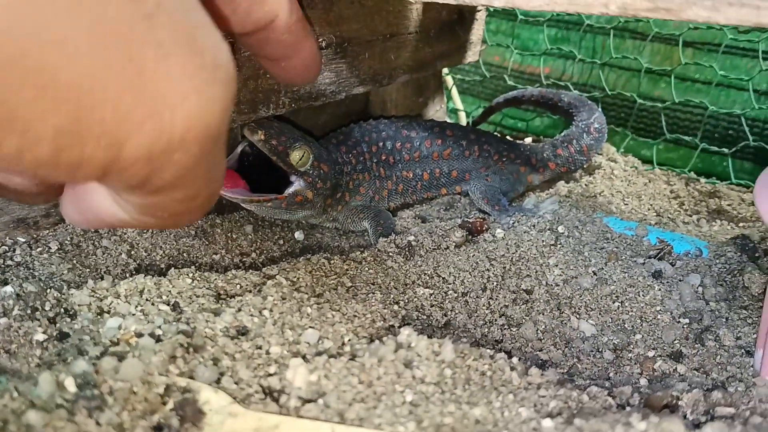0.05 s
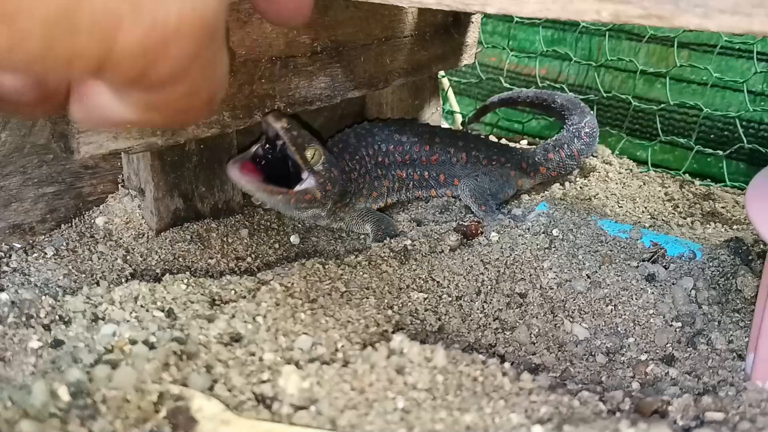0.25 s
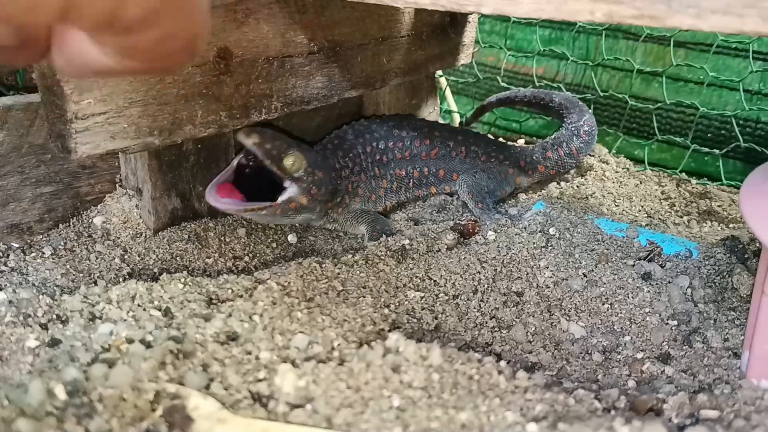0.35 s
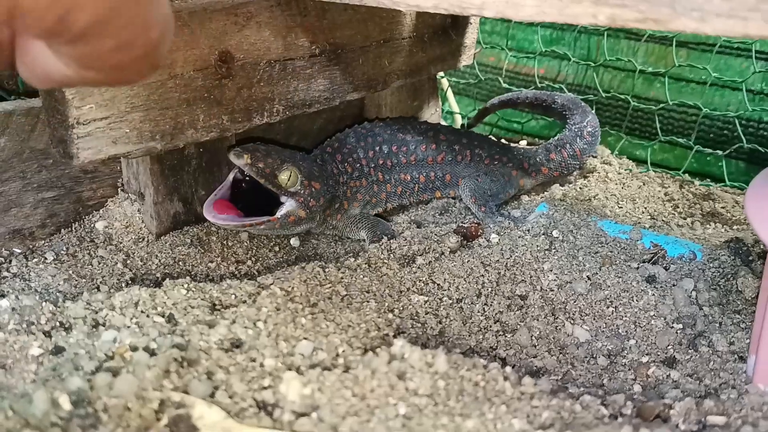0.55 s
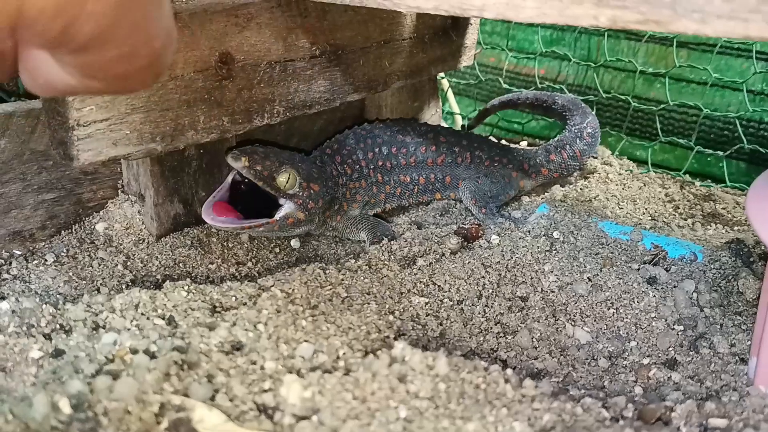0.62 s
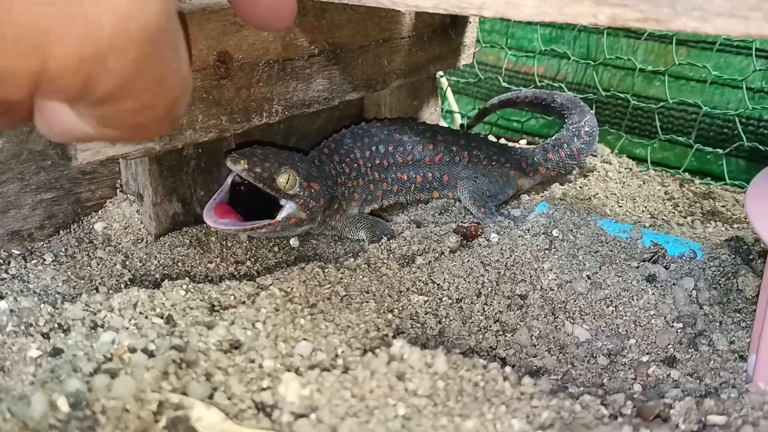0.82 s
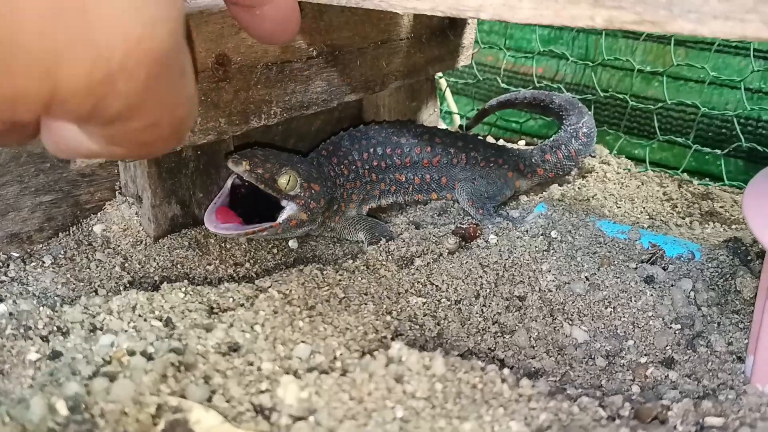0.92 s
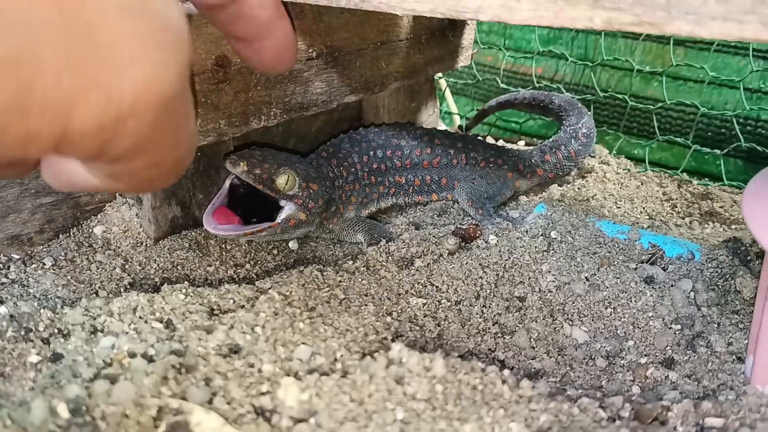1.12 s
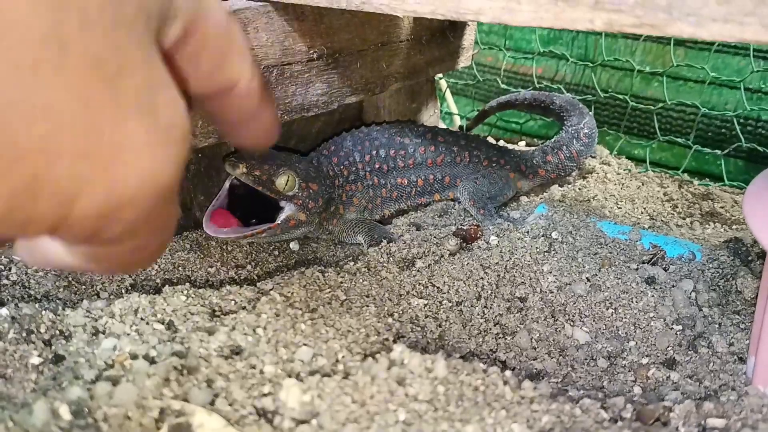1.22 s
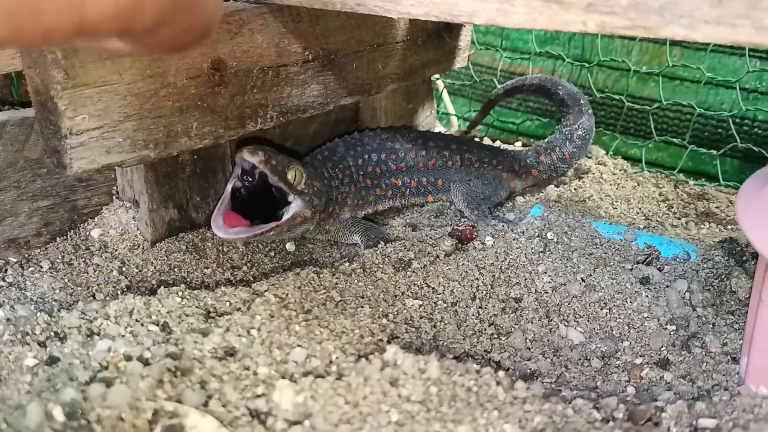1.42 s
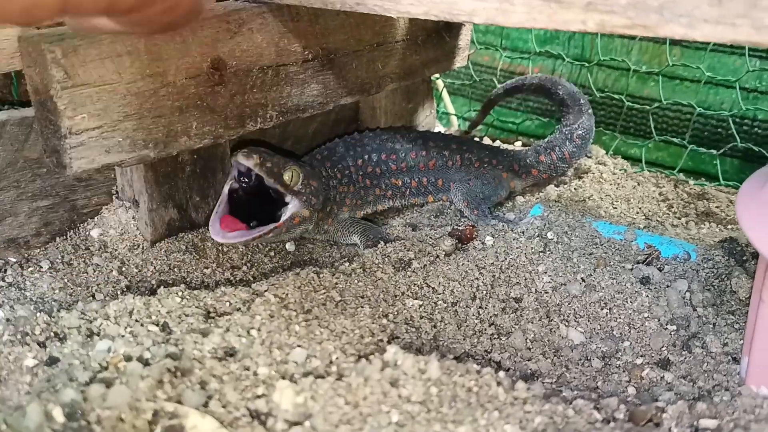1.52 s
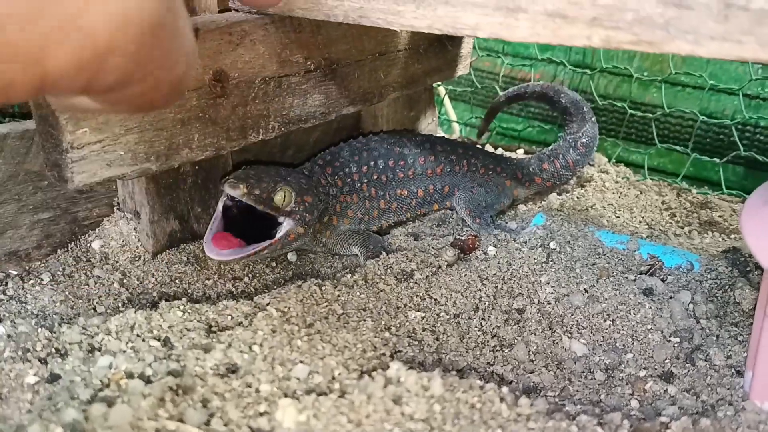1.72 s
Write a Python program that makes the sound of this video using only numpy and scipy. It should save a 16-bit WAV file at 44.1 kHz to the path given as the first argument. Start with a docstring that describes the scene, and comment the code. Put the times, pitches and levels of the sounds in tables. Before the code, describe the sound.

Close by in a wooden pen, a gecko calls in three harsh bursts: a quick bark, a longer clicking rasp, and a bark that breaks into a rasp. The gaps hold only soft air and faint, distant, uneven thudding.

```python
"""A cornered gecko

A gecko barks and rasps at a hand, close by, in a wooden pen with a sandy floor. Each call is a train
of snaps of its vocal folds: fast for a bark, slowing to separate clicks in the rasp. The snaps ring
in the open mouth and the pen. Far off something thuds unevenly, like an idling engine."""
import sys
import numpy as np
from scipy import signal
from scipy.fft import rfft, irfft, next_fast_len
from scipy.io import wavfile

SR = 44100
rng = np.random.default_rng(int(sys.argv[2]) if len(sys.argv) > 2 else 0)


def to_wav(s):
    """Save 16-bit WAV."""
    ch = np.atleast_2d(s).T  # columns
    pcm = np.round(np.clip(ch, -1, 1) * 32767)  # PCM
    wavfile.write(sys.argv[1], SR, pcm.astype(np.int16))


N = 77175
TIME = np.arange(N) / SR


def from_db(db):
    """Turn decibels into a number to multiply by."""
    return 10 ** (np.asarray(db) / 20)


def colour(x, points, column=1):
    """Shape the tone to follow a table of levels; no sound comes early (a minimum-phase filter)."""
    size, table = 2 * next_fast_len(N), np.array(points, float)
    hz = np.maximum(np.arange(size // 2 + 1) * SR / size, 1)
    db = np.interp(np.log(hz), np.log(table[:, 0]), table.T[column])
    cepstrum = irfft(np.log(from_db(db)))
    cepstrum[1:size // 2] *= 2
    cepstrum[size // 2 + 1:] = 0
    return irfft(rfft(x, size) * np.exp(rfft(cepstrum)))[..., :N]


def impulses(times, gain):
    """Clicks at exact times, even between two samples."""
    out = np.zeros(N)
    nearby = (times * SR).astype(int)[:, None] + np.arange(-8, 9)
    away = nearby - times[:, None] * SR
    np.add.at(out, np.clip(nearby, 0, N - 1), gain[:, None] * np.sinc(away) * np.sinc(away / 9))
    return out


def ring(clicks, hz, t60):
    """Each click starts a tone that dies away by 60 dB in t60 seconds."""
    decay, turn = from_db(-60 / (t60 * SR)), 2 * np.pi * hz / SR
    return signal.lfilter([0, np.sin(turn)], [1, -2 * decay * np.cos(turn), decay ** 2], clicks + 1e-18)


def echoes(x, t60):
    """A wash of reflections that starts after 2 ms and fades, different in each ear."""
    tail = rng.standard_normal((2, N)) * from_db(-60 * TIME / t60) * (TIME > .002)
    tail /= np.sqrt(np.sum(tail ** 2, axis=1, keepdims=True))
    return signal.fftconvolve(x, tail, axes=1)[:, :N]


# The tone of the background air: f/Hz, relative level/dB
AIR_TONE = [(25, -6), (100, -2), (200, -5), (400, -11.5), (1000, -19.5), (2500, -22.5), (6000, -30),
            (10000, -40), (16000, -45)]


def air():
    """Faint, dull noise, mostly alike in both ears."""
    shared, spread = colour(rng.standard_normal((2, N)), AIR_TONE)
    return from_db(-46.5) * (shared + from_db(-5.5) * spread * np.array([[1], [-1]]))


# The far-off thuds: t/s, relative level/dB
THUD_BEATS = [(0.01, -50), (0.106, -43), (0.196, -49), (0.289, -64), (0.39, -43), (.473, -52), (.577, -56),
              (0.688, -43), (0.784, -53.5), (.883, -52), (.991, -45.5), (1.085, -43), (1.172, -62.5),
              (1.282, -45), (1.369, -45.5), (1.474, -44), (1.556, -56), (1.672, -41.5)]


def distant_thuds(thud_hz=94.5, width_s=.014, hum_hz=170):
    """Soft, low swells of a few cycles each, over a faint hum."""
    thuds = np.zeros(N)
    for t, db in THUD_BEATS:
        swell = np.exp(-((TIME - t) / width_s) ** 2)
        thuds += from_db(db - 1) * swell * np.sin(2 * np.pi * thud_hz * (TIME - t))
    return thuds + from_db(-69.5) * np.sin(2 * np.pi * hum_hz * TIME)


# Thin squeaks around the calls: t/s, length/s, f/Hz, level/dB
THIN_SQUEAKS = [(0.668, 0.067, 4800, -60), (1.229, 0.0452, 1204, -72), (1.275, 0.1377, 5130, -64.5),
                (1.296, .07, 4590, -76), (1.3, 0.155, 3666, -67), (1.331, 0.093, 3156, -58.5),
                (1.67, 0.097, 4237, -71), (1.693, 0.0593, 4830, -68)]


def squeaks(t60=0.023, fade_s=0.0077):
    """Noise narrowed down to brief, faint whistles."""
    out = np.zeros((2, N))
    for start, length, hz, db in THIN_SQUEAKS:
        noise = rng.standard_normal((2, N))
        whistle = ring(ring(noise, hz, t60), hz, t60)
        fade = np.clip(np.minimum(TIME - start, start + length - TIME) / fade_s, 0, 1)
        out += from_db(db) * whistle / whistle.std() * fade
    return out


# The tone of the room's echo: f/Hz, relative level/dB
ROOM_TONE = [(200, 13), (500, 1), (900, -7.5), (1500, 5), (2100, 5), (2800, -2), (3300, 11), (4500, -3.5),
             (5450, 9), (7000, -3), (8300, 4), (16000, -13)]
# How strongly each of the four calls sets the room ringing: level/dB
ROOM_SHARES = [-22.5, -31, -39.5, -30]


def room_echo(calls):
    """The room rings on faintly after each call."""
    reaching_room = sum(from_db(db) * call for db, call in zip(ROOM_SHARES, calls))
    return colour(echoes(reaching_room, t60=0.35), ROOM_TONE)


# The tone of the hiss that comes with a snap: f/Hz, left level/dB, right level/dB
HISS_TONE = [(295.3, -13.5, -15.5), (2513, 10.5, 4), (4000, -2, -6), (6300, -3.5, 1.5), (8500, -8.5, -5.5),
             (10500, -23.5, -17.5), (12800, 2, -7.5), (15500, -10.5, -24)]


def hiss(times, db, harsh_db, breath, side, decay_s=0.005, knee_db=-6.5):
    """Each snap lets out a puff of air. Above the knee, harshness adds only half as many dB."""
    leaks = impulses(times, from_db(db + (harsh_db + np.minimum(harsh_db, knee_db)) / 2))
    keep = np.exp(-2 / (decay_s * SR))
    puffs = np.sqrt(signal.lfilter([1 - keep], [1, -keep], leaks ** 2 + 1e-18))
    return from_db(-8) * colour(puffs * breath, HISS_TONE, column=side + 1)


# The tone of a snap's harsh edge: f/Hz, left level/dB, right level/dB
CRACK_TONE = [(300, 5, 2), (1500, -4.5, -1.5), (2700, 9, 19), (3558, 9, 10.5), (4200, 5, 6),
              (4900, -3.5, -9.5), (5670, 10, -5.5), (6370, -7, 2), (7843, 2.5, -11.5), (10380, -16.5, -15),
              (12500, 2, -3.5), (15500, -8, -23)]


def crack(times, db, side):
    """The sharp edge of each snap makes a bright click."""
    return -from_db(-14) * colour(impulses(times, from_db(db)), CRACK_TONE, column=side + 1)


# The notes of mouth and pen: f/Hz, ring time/s, left level/dB, right level/dB, left delay/ms
RINGING_NOTES = [(554, 0.12, -61, -50.5, 0.16), (663, 0.053, -59.5, -54, 0.2),
                 (872, 0.041, -57.5, -55, 0.16), (1068, 0.031, -52.0, -42.5, 0.36),
                 (1920, 0.017, -22.0, -56.5, 0.39), (2174, 0.034, -26, -31.5, 0.46),
                 (2274, 0.046, -37.5, -31, 0.51), (2477, 0.056, -27.5, -30, 0.3)]


def ringing(times, db, side, bottom_hz=300, top_hz=2630):
    """The snaps set the mouth and the pen ringing; the lows and highs are trimmed off."""
    notes = np.zeros(N)
    for hz, t60, *levels, delay_ms in RINGING_NOTES:
        arrivals = times + (1 - side) * delay_ms / 1000
        notes += ring(impulses(arrivals, from_db(db + levels[side])), hz, t60)
    cut_highs = signal.butter(10, top_hz, fs=SR, output="sos")
    cut_lows = signal.butter(1, bottom_hz, "high", fs=SR, output="sos")
    return signal.sosfilt(np.vstack([cut_highs, cut_lows]), notes)


# The broad tone of the open mouth: f/Hz, left level/dB, right level/dB
MOUTH_TONE = [(100, -31.5, -39), (227.5, -46.5, -36.5), (303.2, -21.5, -15), (437, -11.5, -6.5),
              (634.3, -0.4, 3), (827, 2, 3.5), (1052, -0.43, -7), (1532, -8, -9.5), (2200, -23.5, -6.5),
              (2412, -28, -3.5), (2805, -20, -14), (3215, -51, -34.5), (3830, -52, -56), (8000, -52, -62.5)]


def mouth_pop(times, db, side):
    """The open mouth rounds each snap into a short pop."""
    return from_db(17) * colour(impulses(times, -from_db(db)), MOUTH_TONE, column=side + 1)


def snaps(call, jitter=0.0026, level_spread_db=0.8, harsh_spread_db=2, most_snaps=400):
    """The vocal folds snap over and over, never quite alike in timing, level or harshness."""
    t, rate, db, harsh_db = np.transpose(call)
    time_wobble, level_wobble, harsh_wobble = rng.standard_normal((most_snaps, 3)).T
    times = [t[0]]
    for wobble in time_wobble[1:]:
        following = times[-1] + (1 + jitter * wobble) / np.interp(times[-1], t, rate)
        if following > t[-1]:
            break
        times.append(following)
    levels = np.interp(times, t, db) + level_spread_db * level_wobble[:len(times)]
    harshness = np.interp(times, t, harsh_db) + harsh_spread_db * harsh_wobble[:len(times)]
    return np.array(times), levels, harshness


# How the vocal folds snap through each call: t/s, snap rate/Hz, relative level/dB, harshness/dB
BARK_CALL = [(.2458, 538, -1.5, 2.5), (.262, 531, -1, -0.5), (.274, 528, 0.5, 0.5), (.278, 530, -1.5, 6),
             (.282, 483, 0, 2), (.293, 390, -1.5, 0), (.2955, 246, 0.5, 1), (.301, 160, -6, 7.5)]
CLICK_CALL = [(.7177, 108.4, -1.4, -5.5), (0.7254, 62.16, -.5, -5.5), (.748, 61, 0.67, -5.5)]
RASP_CALL = [(0.7908, 81.33, 0, -11.5), (0.8032, 183.5, -1, -8.5), (0.8085, 195.3, -0.5, -11.5),
             (0.8192, 161, -0.5, -10.5), (.8255, 89.1, -1, -7.5), (.8367, 79, -1.5, -8.5),
             (.8494, 92.84, 0, -3), (0.8604, 180.2, 0.5, -8.5), (0.8665, 213.6, -0.5, -9),
             (0.8795, 214, 0, -12.5), (0.8841, 176.9, -3, -12), (0.8909, 143.9, 0.5, -7.5),
             (0.8973, 108.8, -3, -6.5), (0.9049, 103.1, -0.5, -8), (0.9161, 147.6, 0.5, -12.5),
             (.9333, 218, 0.5, -9.5), (0.954, 215.2, -2, -10), (.971, 195.7, -1.5, -14),
             (.981, 170.9, -1.5, -12), (1.018, 167.2, -3.5, -15.5), (1.029, 140, -12, -13),
             (1.05, 138.9, -17, -19.5), (1.0557, 99.2, -17.5, -18), (1.066, 76.68, -21, -19),
             (1.093, 98.7, -38, -23)]
BARK_INTO_RASP = [(1.378, 470.1, 0.5, 0.5), (1.394, 412, -0.5, -2.5), (1.4068, 301.1, -1, -3),
                  (1.4101, 177.5, -3.5, -5), (1.4167, 94.24, -3.5, -5.5), (1.4268, 100.1, -1, -11.5),
                  (1.4382, 119.1, -3.5, -3.5), (1.453, 174.4, 1.5, -7.5), (1.464, 227.8, -1, -7),
                  (1.475, 219.9, -1.5, -11.5), (1.4911, 150.3, -9, -10.5), (1.513, 102.1, -11, -13.5),
                  (1.523, 108, -13, -13.5)]


def gecko(call, left_delay_s=.00021):
    """One call: every snap of the vocal folds gives a pop, a ring, a crack and a puff of hiss."""
    times, db, harsh_db = snaps(call)
    breath = rng.standard_normal(N)
    ears = []
    for side, delay in enumerate((left_delay_s, 0)):   # side 0 is left, 1 is right
        arrivals = times + delay
        ears.append(mouth_pop(arrivals, db, side)
                    + ringing(times, db, side)
                    + crack(arrivals, db + harsh_db, side)
                    + hiss(arrivals, db, harsh_db, np.roll(breath, int(delay * SR)), side))
    return np.array(ears)


def scene():
    """The gecko, its echoes from the pen's boards and the room, and the background."""
    calls = [gecko(call) for call in (BARK_CALL, CLICK_CALL, RASP_CALL, BARK_INTO_RASP)]
    voice = sum(calls)
    pen_echo = from_db(-13.5) * echoes(voice, t60=0.05)
    return voice + pen_echo + room_echo(calls) + squeaks() + distant_thuds() + air()


def record(dry):
    """The very highest treble is cut off steeply."""
    stop_hz = 16900
    return signal.sosfilt(signal.cheby2(16, 70, stop_hz, fs=SR, output="sos"), dry)


dry = scene()
out = record(dry)
to_wav(out)
```